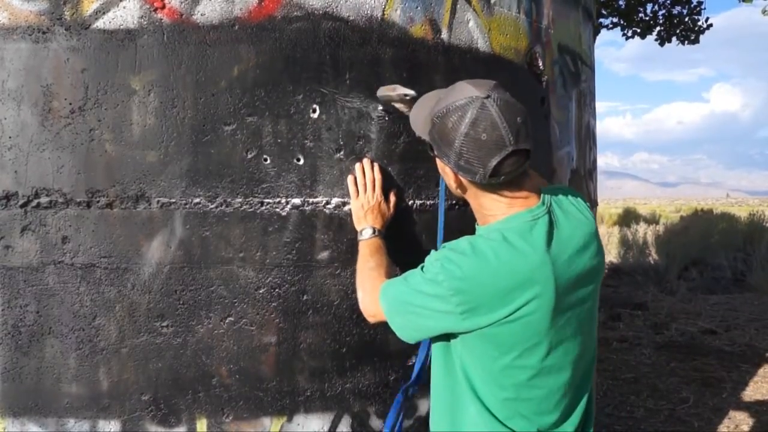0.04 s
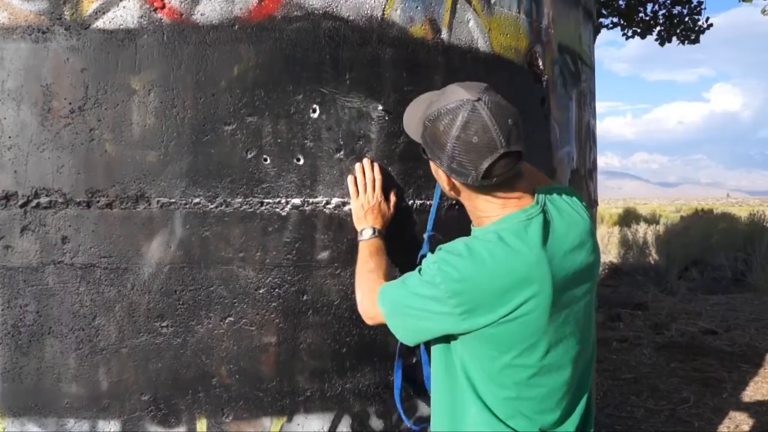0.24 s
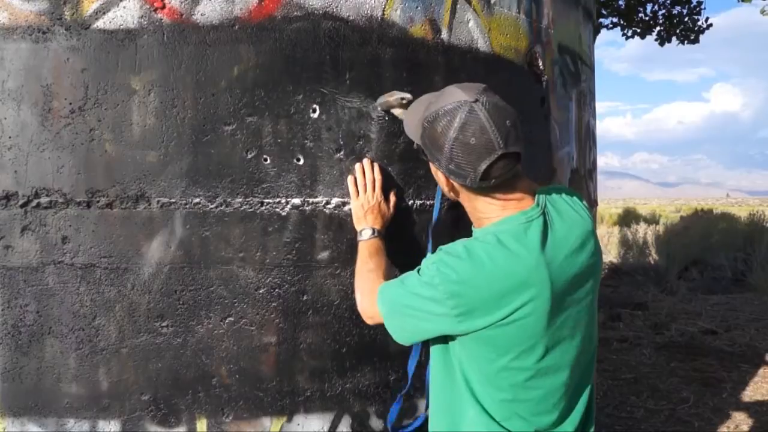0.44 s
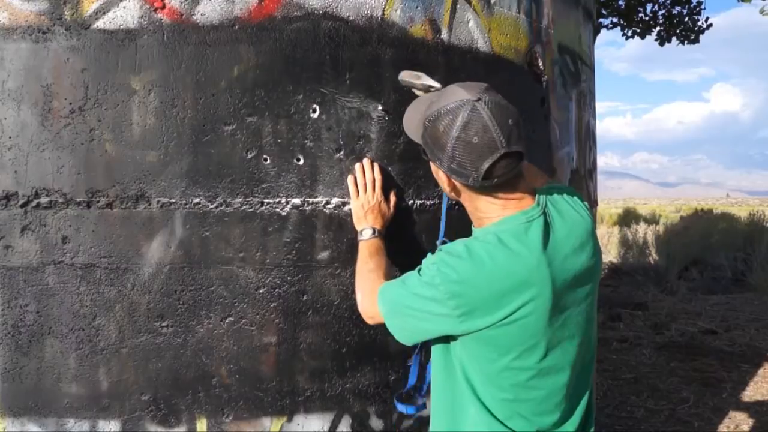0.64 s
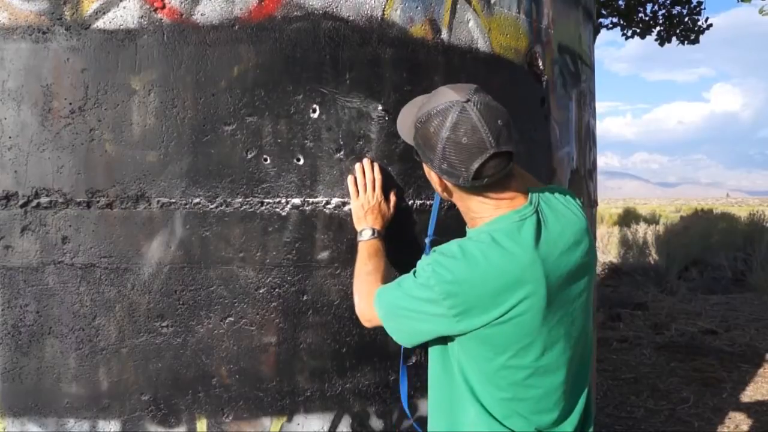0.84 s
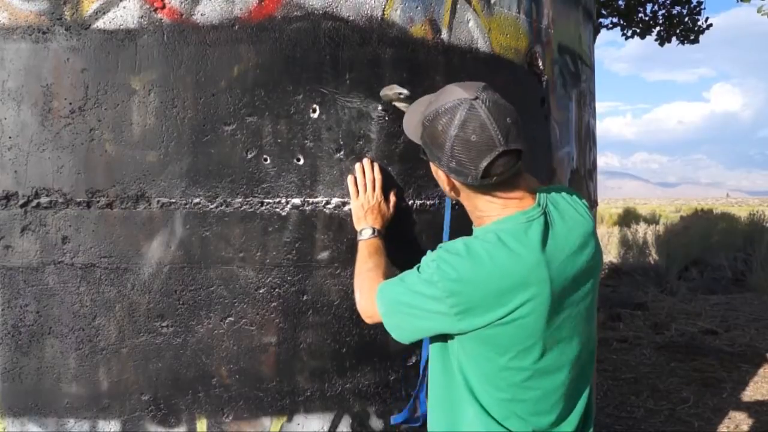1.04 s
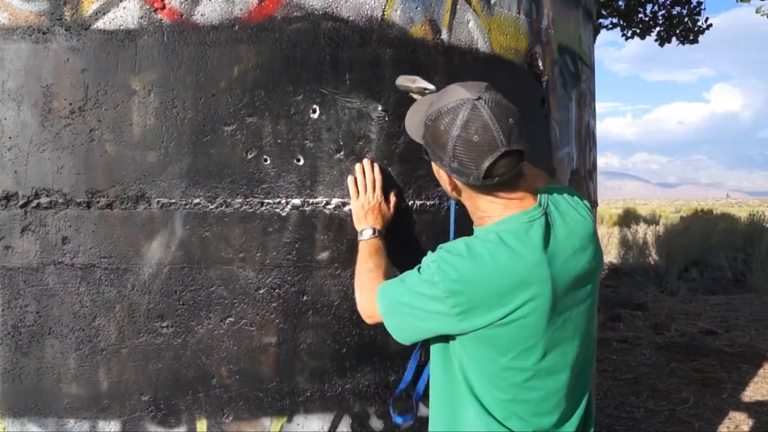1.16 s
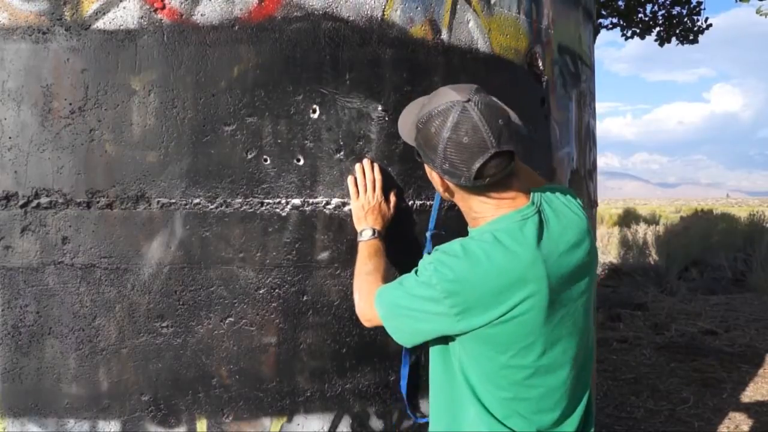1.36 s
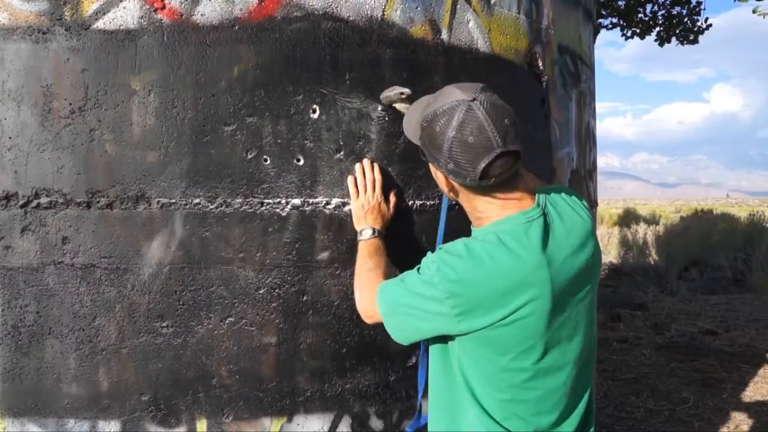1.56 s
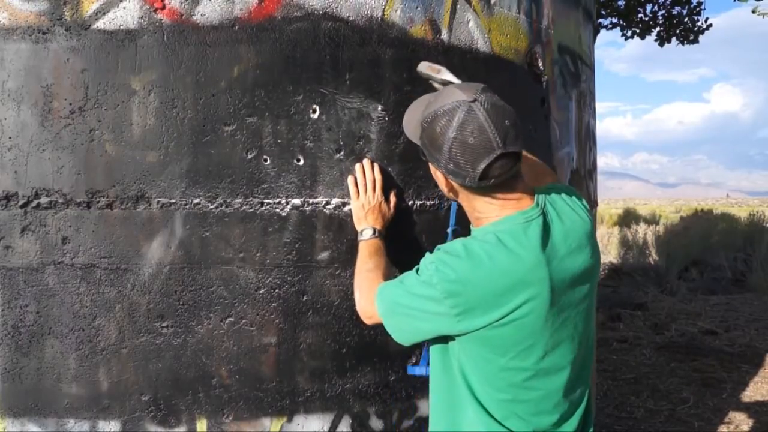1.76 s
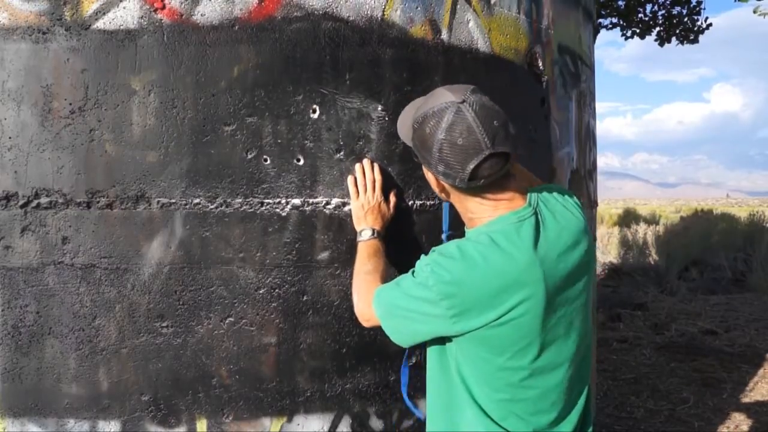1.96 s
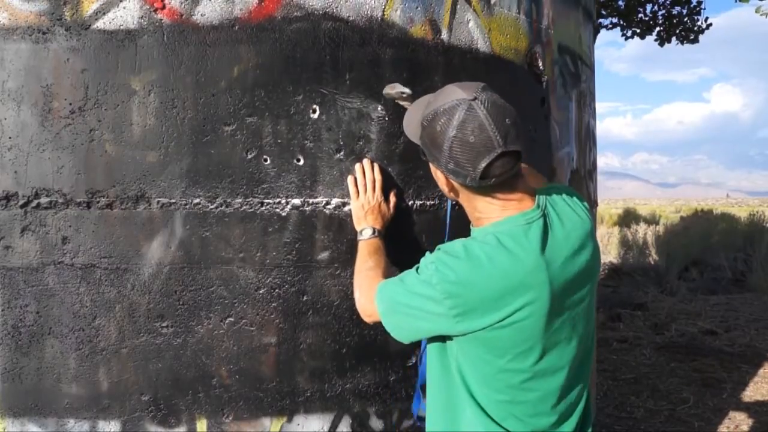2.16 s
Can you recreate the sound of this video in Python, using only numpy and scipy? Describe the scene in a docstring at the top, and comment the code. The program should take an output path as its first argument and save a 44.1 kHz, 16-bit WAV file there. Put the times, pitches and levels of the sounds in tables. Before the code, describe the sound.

Slow, regular hammer blows on steel set in a concrete wall: bright clack, quick dull rebound, then a booming hollow echo dying in under a second. Outdoors, blows slightly left, quiet low rumble and microphone hiss.

```python
"""A hammer drives a steel bolt into the wall of a large hollow concrete structure, outdoors, left of the microphone.
Each blow is a short bright crack of steel modes and grit, then a ring of the same modes as narrow bands of noise.
The far side of the hollow answers some 33 ms later: noise bands swell and die away over a boom of low sines.
Dull knocks, bounces of the head, faint ticks and a soft thud are decaying noise and sines.
A wavering low rumble and steady microphone hiss, both filtered noise, lie under it."""
import sys
import numpy as np
from scipy import signal
from scipy.fft import rfft, irfft, next_fast_len
from scipy.io import wavfile
from scipy.ndimage import map_coordinates

SR = 44100
rng = np.random.default_rng(int(sys.argv[2]) if len(sys.argv) > 2 else 0)


def voltage_ratio(decibels):
    """Convert decibels (scalar or array-like) to amplitude ratios, 20 dB per decade."""
    exponent = np.asarray(decibels, float) / 20
    return 10 ** exponent


def digitize_waveform(pressure):
    """Quantize a signal to 16-bit integers and store it at the path in sys.argv[1].

    Rows of a 2-D input are taken as channels; values are limited to [-1, 1].
    """
    field = np.atleast_2d(pressure).T
    bounded = np.clip(field, -1, 1)
    quanta = np.round(bounded * 32767).astype(np.int16)
    wavfile.write(sys.argv[1], SR, quanta)


N = 97902
T = np.arange(N) / SR  # s


def unit(x):
    """Scaled to rms 1."""
    return x / np.sqrt(np.mean(x ** 2) + 1e-20)


def along(points, hz):
    """Reads (Hz, value) points on a log frequency axis."""
    point_hz, values = np.transpose(points)
    return np.interp(np.log(hz + 1), np.log(point_hz + 1), values)


def filtered(x, response):
    """x times a complex response of frequency."""
    size = next_fast_len(N + 8192)
    return irfft(rfft(x, size) * response(np.fft.rfftfreq(size, 1 / SR)), size)[..., :N]


# likeness of left and right in the noises of the blows: pitch_hz, likeness (1 = the same)
LIKENESS = [(60, 0.63), (150, 0.76), (380, 0.94), (950, 0.75), (2380, 0.88), (5980, 0.28), (15000, 0.36)]


def pair(likeness):
    """Stereo white noise whose left-right likeness follows (Hz, value) points."""
    def mid_and_side(hz):
        angle = np.arccos(np.clip(along(likeness, hz), -1, 1)) / 2
        return np.array([np.cos(angle), np.sin(angle)])
    mid, side = filtered(rng.standard_normal((2, N)), mid_and_side)
    return np.array([mid + side, mid - side])


def resonance(hz, width_hz):
    """Causal band response of one damped resonance."""
    return lambda f: 1j * f * width_hz / (hz * hz - f * f + 1j * f * width_hz)


def dying(start_s, t60_s, rise_s=0.000067):
    """Envelope that rises from start_s and decays by 60 dB in t60_s."""
    t = np.maximum(T - start_s, 0)
    return voltage_ratio(-60 * t / t60_s) * (1 - np.exp(-t / rise_s))


FAR_SIDE_S, SWELL_S, KNEE_S = 0.0326, 0.004, 0.019  # delay of the far side, its swell, softness of the fall


def swell(start_s, early_db, late_db, hold_s, t60_s, rise_s):
    """Steady after the blow, moves to late_db once the far side answers, holds, then dies."""
    t = T - start_s
    late = 1 - np.exp(-np.maximum(t - FAR_SIDE_S, 0) / rise_s)
    fall_s = KNEE_S * np.logaddexp(0, (t - FAR_SIDE_S - hold_s) / KNEE_S)
    return (t > 0) * voltage_ratio(early_db + (late_db - early_db) * late - 60 * fall_s / t60_s)


# blows of the hammer, levels relative:
# start_s, crack_db, wall_db (also the ring), treble_tilt_db per octave, boom_db (also the low wall)
BLOWS = [(-.1, -24, 0, 0.5, 1), (.4318, -21.5, 0.5, 1, 1), (0.9627, -23, -1, 0, 0),
         (1.5145, -21.5, 0, 1.5, -0.5), (2.0717, -21.5, -0.5, 1, 0.5)]
# modes of bolt and hammer head, levels relative: pitch_hz, crack_db, ring_db, ring_width_hz, ring_t60_s
STEEL = [(2926, -6.5, -46, 270, 0.32), (3107, -13.5, -49, 55, 0.26), (3900, -9, -48.5, 830, 0.31),
         (5460, -5.5, -47.5, 520, 0.36), (5900, -8, -48, 400, 0.42), (7320, -4.5, -51, 600, 0.46),
         (8110, -11, -45.5, 200, 0.32), (8980, -7.5, -54, 37, 0.32), (10170, -5.5, -52.5, 500, 0.31),
         (11030, -15.5, -51, 420, 0.26), (11680, -3, -48, 150, 0.25)]
# how each blow favours the steel modes: one row a blow, one level_db for each mode
FAVOUR = [(7.5, 0.25, 6, -21, -9, 5.5, 3, 2, -8, -5.5, -3),
          (-4, 2.5, 6, 4.5, -6, -1, -2.5, 7.5, 0, 4, -17.5),
          (7, 0.47, 6.5, 2.5, 3, 1.5, -22, 1.5, -1.8, 6, 4), (1, 0.14, -2, 0.5, -1, -6, 5, -1.5, 1, 9, 8),
          (3.5, 2.4, -7.5, 1.5, -2.5, -2, 2.5, 3, 1.57, 7, 1)]
CRACK_SCATTER = 0.01  # random spread of each mode's pitch, as a fraction of it
CRACK_RISE_S, CRACK_T60_S, GRIT_T60_S = 0.00018, 0.012, 0.013
GRIT_DB, CRACK_LEAN_DB = -3, 4  # grit against the modes; left over right
CRACK_DULL_HZ = 11600


def crack():
    """Steel on steel: all modes flash at once as short sines, with noise for grit."""
    out = np.zeros((2, N))
    grit = unit(filtered(pair(LIKENESS), resonance(5960, 9200)))
    for (start_s, blow_db, *_), favours in zip(BLOWS, FAVOUR):
        modes = np.zeros(N)
        for (hz, mode_db, *_), favour_db in zip(STEEL, favours):
            cycles = hz * rng.normal(1, CRACK_SCATTER) * T + rng.random()
            modes += voltage_ratio(mode_db + favour_db) * np.sin(2 * np.pi * cycles)
        flash = modes * dying(start_s, CRACK_T60_S, CRACK_RISE_S)
        scrape = voltage_ratio(GRIT_DB) * grit * dying(start_s, GRIT_T60_S, CRACK_RISE_S)
        out += voltage_ratio(blow_db) * (flash + scrape)

    def dull(f):
        ratio = f / CRACK_DULL_HZ
        return 1 / (1 + 1j * ratio - ratio ** 2) ** 2
    return filtered(out, dull) * voltage_ratio([[CRACK_LEAN_DB / 2], [-CRACK_LEAN_DB / 2]])


RING_EARLY_DB, RING_HOLD_S = -7, 0.04  # level before the far side answers; hold after it


def ring():
    """The steel modes ring on as narrow bands of noise, blurred by the hollow."""
    out, noise = np.zeros((2, N)), pair(LIKENESS)
    for m, (hz, _, mode_db, width_hz, t60_s) in enumerate(STEEL):
        power = np.zeros(N)
        for (start_s, _, blow_db, *_), favours in zip(BLOWS, FAVOUR):
            envelope = swell(start_s, RING_EARLY_DB, 0, RING_HOLD_S, t60_s, SWELL_S)
            power += voltage_ratio(2 * (mode_db + blow_db + favours[m])) * envelope ** 2
        band = unit(filtered(noise, lambda f: resonance(hz, width_hz)(f) ** 2))
        out += band * np.sqrt(power)
    return out


# diffuse answer of the hollow, levels relative:
# pitch_hz, early_db (before the far side answers), late_db (after), hold_s, t60_s
WALL = [(60, -82, -56, 0.16, 1.1), (116, -47.5, -42.5, 0.25, 0.91), (250, -43, -35.5, .15, 0.61),
        (401, -39.5, -38.5, 0.081, 0.54), (683, -47.5, -47.5, 0.037, 0.45), (1100, -46.5, -42, 0.02, 0.46),
        (1634, -55, -54.5, 0.017, 0.44), (3100, -50, -42.5, 0.035, 0.35), (4750, -49.5, -46.5, 0.024, 0.34),
        (5660, -52, -44, 0.02, 0.34), (6700, -54.5, -47.5, 0.02, 0.32), (8500, -48, -44.5, 0.02, 0.32),
        (11800, -46, -44.5, 0.018, 0.22), (13000, -69, -78, 0.0413, 0.21), (16000, -80, -83, .04, .2)]
SAME_BELOW_HZ, LOW_SWELL_CYCLES = 500, 0.83  # low bands answer alike; they swell more slowly


def wall():
    """Dense modes of the hollow, each noise band with its own swell and decay; low ones answer every blow alike."""
    out, noise = np.zeros((2, N)), pair(LIKENESS)
    centres = [row[0] for row in WALL]
    for k, (hz, early_db, late_db, hold_s, t60_s) in enumerate(WALL):
        # full at its own centre, fading to nothing at the neighbouring ones
        weights = list(zip(centres, np.eye(len(WALL))[k]))
        band = unit(filtered(noise, lambda f: along(weights, f) * (f > 30)))
        for b, (start_s, _, blow_db, tilt_db, low_db) in enumerate(BLOWS):
            if hz < SAME_BELOW_HZ:
                shift, level_db = round(start_s * SR), low_db
            else:
                shift, level_db = b * N // 7, blow_db + tilt_db * np.log2(hz / 2000)
            envelope = swell(start_s, early_db, late_db, hold_s, t60_s, SWELL_S + LOW_SWELL_CYCLES / hz)
            out += np.roll(band, shift, axis=1) * voltage_ratio(level_db) * envelope
    return out


# low modes of the hollow, levels relative: pitch_hz, level_db, t60_s
BOOM = [(126.06, -5.5, 0.98), (146.6, -8.5, 1), (166, -3, 0.78), (178.9, -5.5, 0.85), (204.5, -2, 0.7),
        (230.2, 2, 0.65), (242.4, 1, 0.64), (264, -0.5, 0.68), (297.3, -8.5, 0.46), (324.3, -5.5, 0.74),
        (344.3, -4.5, 0.56), (360.4, -11.5, 0.81), (388.7, -3.5, 0.46), (444.7, -10, 0.38), (452, -8, 0.4),
        (559, -5.5, .3), (610, -23, 1), (725, -15.5, 0.63), (840, -14, 0.17), (917, -14, 0.37),
        (1130, -16, .4)]
BOOM_DB, BOOM_SWELL_CYCLES = -28, 14


def boom():
    """The same low modes sound at every blow; their spacing makes the boom return in bursts."""
    out = np.zeros(N)
    for start_s, *_, blow_db in BLOWS:
        for hz, mode_db, t60_s in BOOM:
            envelope = dying(start_s, t60_s, BOOM_SWELL_CYCLES / hz)
            out += voltage_ratio(BOOM_DB + blow_db + mode_db) * envelope * np.sin(2 * np.pi * hz * (T - start_s))
    return out


# the hammer head touches again: start_s, level_db (relative)
BOUNCES = [(.4648, -30), (.9880, -34), (1.5445, -27), (2.0950, -31)]
SLAP_HZ, SLAP_WIDTH_HZ, SLAP_T60_S = 1500, 2200, 0.045
KNOCK_DB, KNOCK_T60_S = -30.5, 0.026  # dull part of the first contact


def knocks():
    """The dull knock of each blow and the slap of each bounce: one band of noise, quickly damped."""
    envelope = sum(voltage_ratio(db) * dying(start_s, SLAP_T60_S, 0.00066) for start_s, db in BOUNCES)
    envelope = envelope + sum(voltage_ratio(KNOCK_DB) * dying(start_s, KNOCK_T60_S) for start_s, *_ in BLOWS)
    band = filtered(pair(LIKENESS), lambda f: resonance(SLAP_HZ, SLAP_WIDTH_HZ)(f) ** 2)
    return envelope * unit(band)


CLANG_ABOVE_HZ, CLANG_DB, CLANG_T60_S = 680, 5.5, 0.14  # modes that clang; level over bounce and mode


def clang():
    """Each bounce sets off the upper modes of the boom for a short clang."""
    out = np.zeros(N)
    for start_s, bounce_db in BOUNCES:
        for hz, mode_db, _ in BOOM:
            if hz > CLANG_ABOVE_HZ:
                envelope = dying(start_s, CLANG_T60_S, 0.00088)
                tone = np.sin(2 * np.pi * hz * (T - start_s))
                out += voltage_ratio(bounce_db + mode_db + CLANG_DB) * envelope * tone
    return out


# a soft low thud: start_s, level_db (relative), pitch_hz, t60_s
THUD = (1.858, -19, 165, .035)


def thud():
    """One low sine that dies at once."""
    start_s, level_db, hz, t60_s = THUD
    return voltage_ratio(level_db) * dying(start_s, t60_s, 0.0029) * np.sin(2 * np.pi * hz * (T - start_s))


# faint ticks: start_s, level_db (relative)
TICKS = [(0.1395, -50), (0.1715, -48), (0.206, -53), (0.237, -53.5), (0.2722, -51.5), (0.304, -52.5),
         (0.369, -50.5), (1.9995, -55)]
TICK_HZ, TICK_WIDTH_HZ, TICK_T60_S = 1300, 400, 0.024


def ticks():
    """Faint short bursts of one noise band."""
    envelope = sum(voltage_ratio(db) * dying(start_s, TICK_T60_S, 0.0018) for start_s, db in TICKS)
    return envelope * unit(filtered(pair(LIKENESS), resonance(TICK_HZ, TICK_WIDTH_HZ)))


# spectrum of the rumble: pitch_hz, level_db (relative)
RUMBLE = [(13, -26), (22, -17.5), (75, 0.5), (344, -14), (447, -22), (524, -35.5), (651, -23), (700, -43),
          (910, -78), (1540, -120)]
# slow course of the rumble: start_s, level_db (relative)
GUSTS = [(0, -15), (.25, 2), (.42, -1), (.7, 8), (.9, -8.5), (1.05, -11), (1.3, 9), (1.5, -2), (1.7, 0),
         (1.9, 1), (2.05, 8), (2.22, 6)]
RUMBLE_DB, RUMBLE_WAVER_DB, RUMBLE_LIKENESS = -49.5, -0.5, 0.78


def rumble():
    """Outdoor rumble: low noise in gusts, with a slight random waver of six points a second."""
    waver = map_coordinates(rng.standard_normal(20), [T * 6])
    gusts_db = np.interp(T, *np.transpose(GUSTS))
    noise = unit(filtered(pair([(100, RUMBLE_LIKENESS)]), lambda f: voltage_ratio(along(RUMBLE, f))))
    return voltage_ratio(RUMBLE_DB + RUMBLE_WAVER_DB * waver + gusts_db) * noise


# spectrum of the microphone hiss: pitch_hz, level_db (relative)
HISS = [(350, -18), (600, -3), (1410, -1.5), (1690, -6.5), (2030, -5), (3070, -8), (3940, -8.5),
        (13100, -16.5), (16400, -29)]
HISS_DB, HISS_LIKENESS = -67.5, 0.42


def hiss():
    """Steady microphone hiss: shaped stereo noise."""
    return voltage_ratio(HISS_DB) * unit(filtered(pair([(100, HISS_LIKENESS)]), lambda f: voltage_ratio(along(HISS, f))))


# lean of all but crack and background: pitch_hz, level_db (left over right)
LEAN = [(60, 3), (150, .5), (380, 1), (950, 0.5), (2380, -2), (5980, 5.5), (9000, 10.5), (13000, -4)]
DULL_ABOVE_HZ = 12400


def scene():
    """Cracks on the left, their answer leaning by pitch and without the top treble, and the background."""
    def placed(f):
        sides = voltage_ratio(np.outer([0.5, -0.5], along(LEAN, f)))
        return sides / np.sqrt(1 + (f / DULL_ABOVE_HZ) ** 40)
    answer = filtered(ring() + wall() + boom() + knocks() + clang() + thud() + ticks(), placed)
    return crack() + answer + rumble() + hiss()


def roll_off(x):
    """The treble ends steeply here."""
    return signal.sosfilt(signal.butter(12, 16510, fs=SR, output="sos"), x)


def record(dry):
    """Takes the finished stereo mix as it stands at the microphone."""
    return roll_off(dry)


dry = scene()
out = record(dry)
digitize_waveform(out)
```